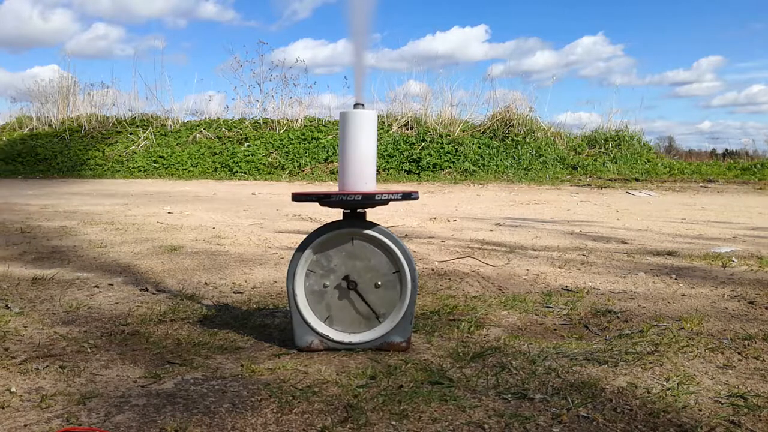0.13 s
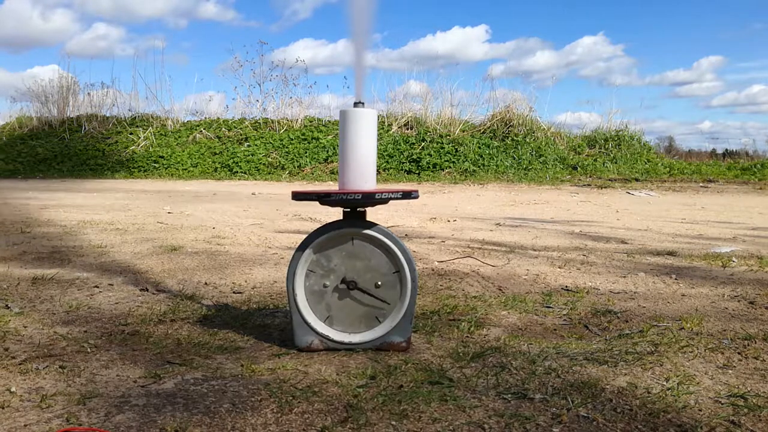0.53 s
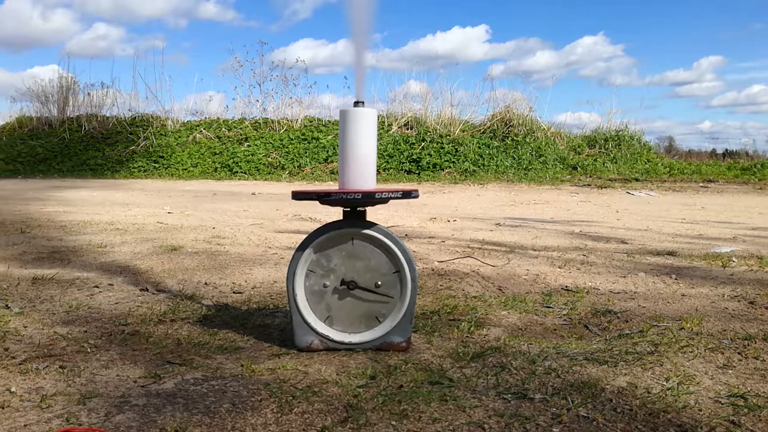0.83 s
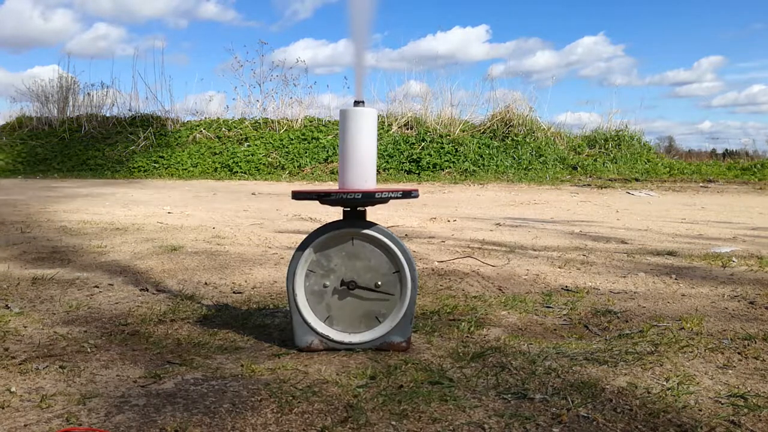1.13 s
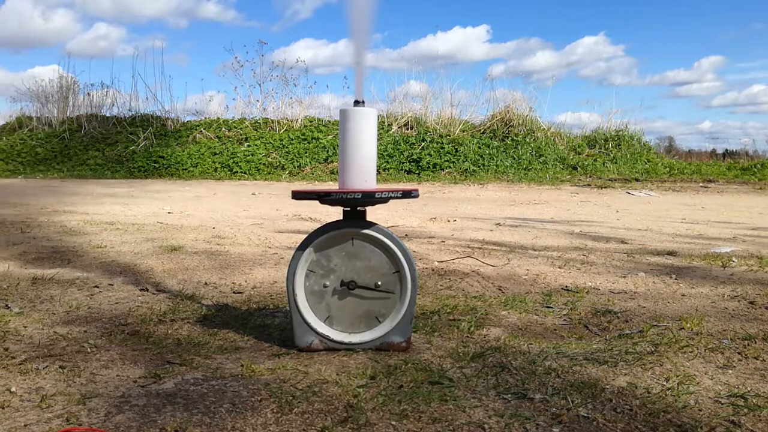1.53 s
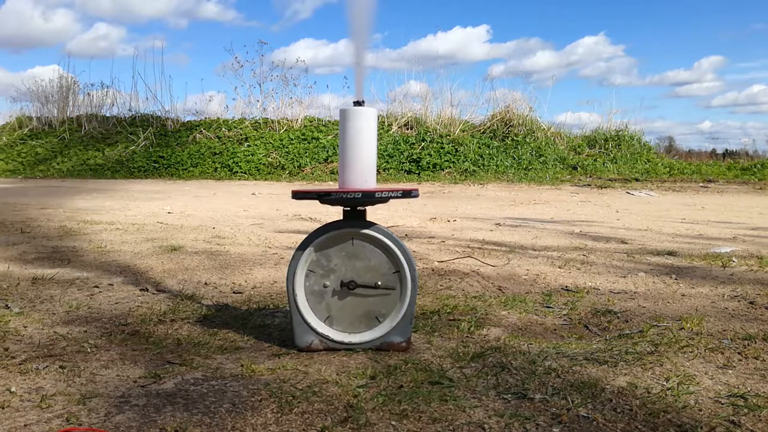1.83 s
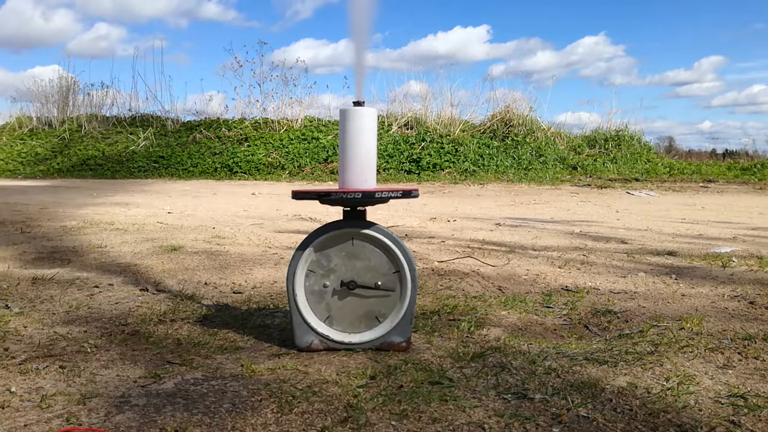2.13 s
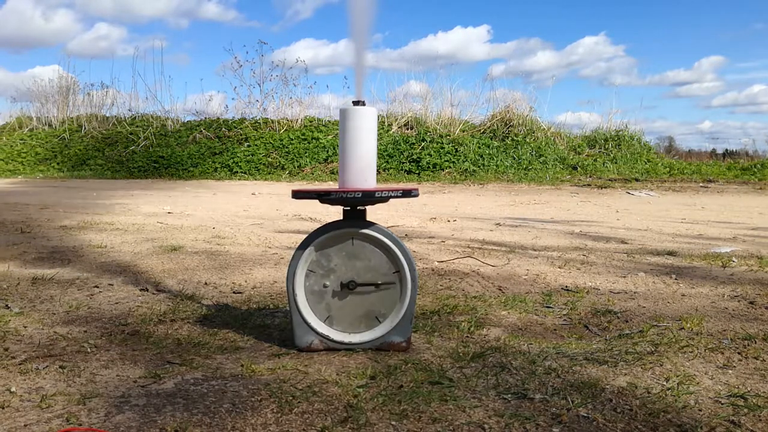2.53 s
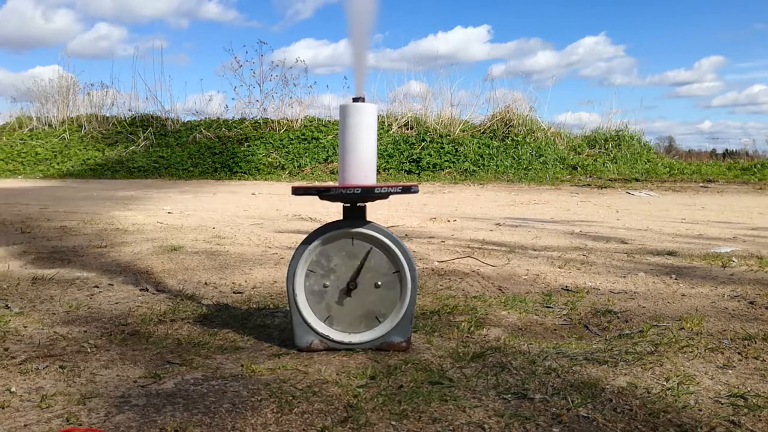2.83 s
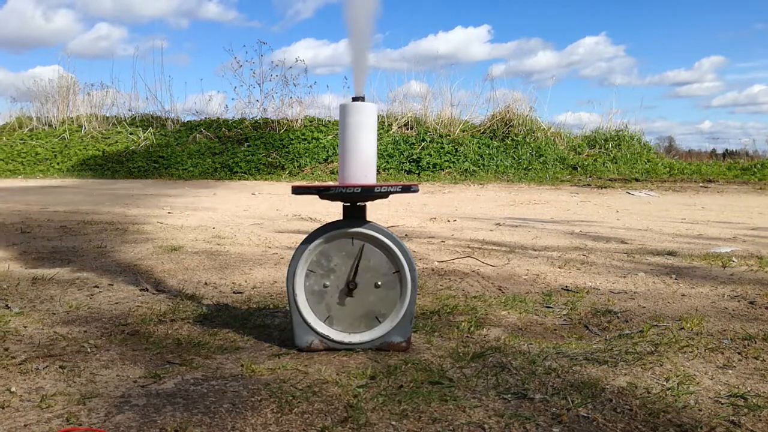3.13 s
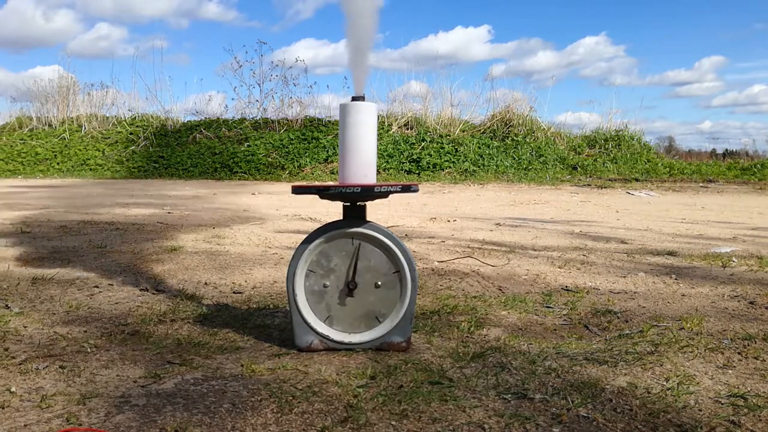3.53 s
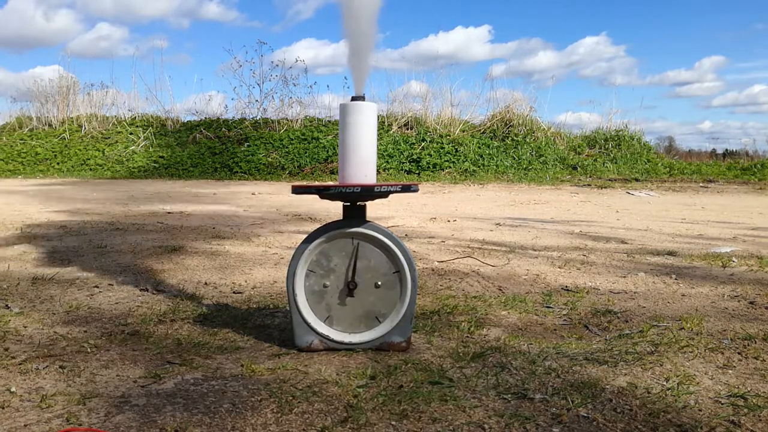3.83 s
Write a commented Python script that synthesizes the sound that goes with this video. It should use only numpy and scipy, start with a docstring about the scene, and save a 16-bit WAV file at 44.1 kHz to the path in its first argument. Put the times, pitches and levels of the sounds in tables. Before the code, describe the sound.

Loud steady rocket jet hiss over a low roar, collapsing quickly into a faint breath of gas

```python
"""Open field: a small solid rocket motor burns nozzle-up on a scale, close to a two-port microphone.
The jet, shaped noise mixed with tiny random shocks, hisses and crackles over the low roar of its plume.
A few soft chuffs are short low pressure swings; the quiet air is faint filtered noise.
Thrust collapses at 2.55 s: the plume shortens, the hiss sinks while its hollow colour slides upward,
and after 3.6 s only a sigh of gas is left."""
import sys
import numpy as np
from scipy import signal
from scipy.fft import rfft, irfft
from scipy.io import wavfile
from scipy.ndimage import uniform_filter1d

SR = 44100
rng = np.random.default_rng(int(sys.argv[2]) if len(sys.argv) > 2 else 0)


def to_wav(s):
    """Save 16-bit WAV."""
    ch = np.atleast_2d(s).T  # columns
    pcm = np.round(np.clip(ch, -1, 1) * 32767)  # PCM
    wavfile.write(sys.argv[1], SR, pcm.astype(np.int16))


N = 176400

# strength of the jet's hiss before trim: time_s, level_db
HISS_LEVEL = [(0, -21), (0.15, -22), (0.32, -22.5), (0.36, -23.8), (0.39, -22.5), (0.58, -24.0),
              (1.15, -24), (1.45, -24), (1.72, -25.5), (2.05, -24.5), (2.25, -23.5), (2.57, -25.5),
              (2.62, -29), (2.71, -34.5), (2.8, -35.8), (3.05, -41), (3.35, -47.5), (3.58, -52.5),
              (3.66, -63.5), (3.85, -72), (4, -80.5)]


def undb(db):
    """Amplitude ratio of a level in dB."""
    return 10 ** (np.asarray(db) / 20)


def curve(rows, t_s, column=1):
    """A table column against time, joined by straight lines."""
    rows = np.array(rows)
    return np.interp(t_s, rows[:, 0], rows[:, column])


def spectrum(rows, hz, column=1):
    """A table column against log frequency."""
    rows = np.array(rows)
    return np.interp(np.log(hz + 1), np.log(rows[:, 0]), rows[:, column])


def walk(rate_per_s):
    """Random levels held for 1 / rate, slewed by two moving averages and scaled to unit deviation."""
    hold = int(SR / rate_per_s)
    steps = np.repeat(rng.standard_normal(N)[:N // hold + 1], hold)
    slow = uniform_filter1d(uniform_filter1d(steps, hold), hold)[:N]
    return slow / slow.std()


def failing(t_s):
    """State of the plume, read from the hiss level: 0 at full thrust, 1 when short and weak."""
    full_db, weak_db = -24.5, -51
    return np.clip((full_db - curve(HISS_LEVEL, t_s)) / (full_db - weak_db), 0, 1)


def turbulence():
    """Mixing noise plus a dense rain of small, uneven shocks whose power share fades with the thrust."""
    shocks_per_s, size_spread_db, full_thrust_share = 2800, 4, 0.29
    sizes = undb(size_spread_db * np.minimum(rng.standard_normal(N), 3))
    shocks = (rng.random(N) < shocks_per_s / SR) * sizes
    shocks = (shocks - shocks.mean()) / shocks.std()
    share = full_thrust_share * (1 - failing(np.arange(N) / SR))
    return np.sqrt(share) * shocks + np.sqrt(1 - share) * rng.standard_normal(N)


def jet_gain(hz, ripple_hz, t_s, weak):
    """Hiss and roar gain by port, frequency and time; colour slides up as the plume shortens."""
    # roar of the large eddies in the plume before trim: time_s, level_db
    roar_level = [(0, -40.5), (0.1, -40.5), (0.9, -43), (1.45, -43.5), (2.05, -44), (2.3, -43),
                  (2.52, -43.2), (2.78, -51), (2.92, -58.5), (3.1, -60.5), (3.2, -66), (3.5, -69.5),
                  (3.87, -77), (4, -82)]
    # colour at full thrust, rippled by the ground reflection: freq_hz, left_rel_db, right_rel_db
    full_colour = [(40, -35, -37.5), (130, -27, -25.5), (220, -12, -13), (328, -11.5, -11),
                   (580, -13.5, -17.5), (770, -15, -13.5), (910, -23, -11), (1104, -11.5, -6.5),
                   (1330, -6.5, -5.5), (1520, -4.5, -3.5), (2050, -2, -8.5), (2500, -7.5, -5.5),
                   (2900, -8.5, -4), (3370, -7, -1.0), (3700, -2.5, -4.5), (4150, -5, -6.5),
                   (4530, -7, -3.5), (5020, -12, 1.5), (5050, -7.5, -2), (5680, -5.5, -3.5),
                   (6680, -7.5, -9.5), (8000, -14.5, -12.5), (9300, -11.5, -18.5), (10600, -11.5, -18),
                   (11700, -14.5, -22.5), (13100, -13.5, -18.0), (15600, -14.5, -16.5)]
    # colour of the failing plume before the ripple slides up: freq_hz, left_rel_db, right_rel_db
    weak_colour = [(40, -27, -27), (140, -20.0, -20.0), (270, -17.5, -17.5), (400, -18.0, -18.0),
                   (600, -16.0, -24), (780, -19.5, -23), (920, -29.5, -12), (1060, -10, -4.5),
                   (1350, -3.5, -2), (1640, -2.5, -4.5), (1900, 1, -3), (2150, -6.5, 0.5), (2650, -4, -9.5),
                   (3220, -9.0, 0.5), (3800, -5, -3.0), (4400, -10, -4), (5200, -8, -4.5),
                   (6370, -9.5, -13.5), (7000, -14.5, -16), (7880, -15.5, -13.5), (8600, -19.5, -23),
                   (10800, -16, -22.5), (15500, -18, -21)]
    # dull, hollow colour of the last gas leaving the casing: freq_hz, left_rel_db, right_rel_db
    spent_colour = [(50, -13, -12), (200, -2.0, -2.0), (400, -2, -2), (650, -6, -10), (1030, -13, -11.5),
                    (1400, -7, -1.5), (1800, -5.0, -5), (2130, 0, -3), (2450, -7, 2), (2900, -7.0, -13),
                    (3300, -11, -9), (3750, -14.0, -3), (4250, -7, -2), (5000, -17.0, -11.0),
                    (5800, -11.0, -8.0), (7200, -15, -17), (8200, -22, -25), (9000, -26.5, -28.0),
                    (11000, -23, -30.0), (15500, -32, -31.5)]
    hiss_trim_db, roar_trim_db, split_hz = 3.5, 1.25, 898
    sigh_onset_db, sigh_range_db = -51, 10  # hiss level where the sigh sets in, further fall to sigh alone

    def both_ports(rows, at_hz):
        return np.array([spectrum(rows, at_hz, 1), spectrum(rows, at_hz, 2)])

    def at_level(gain, db):
        return gain * undb(db) / np.sqrt(np.mean(gain ** 2, axis=(0, 1)))

    hiss_db = curve(HISS_LEVEL, t_s)
    spent = np.clip((sigh_onset_db - hiss_db) / sigh_range_db, 0, 1)
    full_db = both_ports(full_colour, ripple_hz)
    weak_db = both_ports(weak_colour, ripple_hz)
    burning_db = (1 - weak) * full_db + weak * weak_db
    colour = undb((1 - spent) * burning_db + spent * both_ports(spent_colour, hz))
    low = 1 / (1 + (ripple_hz / split_hz) ** 20)  # power share of the roar region
    hiss = at_level(colour * np.sqrt(1 - low), hiss_db + hiss_trim_db)
    roar = at_level(colour * np.sqrt(low), curve(roar_level, t_s) + roar_trim_db)
    return np.hypot(hiss, roar)


def jet():
    """Fluttering turbulence that reaches the two ports partly alike and slightly out of step."""
    # likeness of the jet at the two ports: freq_hz, coherence_0_1, left_lead_rad
    full_ports = [(30, 1.0, 0.0), (450, 0.99, 0.0), (800, 0.49, -1.9), (950, 0.56, -0.1),
                  (1150, 0.97, -0.3), (1700, 0.96, -0.1), (2200, 0.67, -0.6), (2800, 0.26, -2.3),
                  (3400, 0.61, -0.6), (3950, 0.45, -1.4), (4650, 0.49, -3.0), (5100, 0.58, -1.8),
                  (5700, 0.61, -2.0), (6500, 0.71, -2.8), (8000, 0.92, -3.1), (9400, 0.45, -3.9),
                  (11500, 0.44, -6.0), (13500, 0.57, -7.3), (15600, 0.53, -7.7)]
    # likeness of the short plume at the two ports: freq_hz, coherence_0_1, left_lead_rad
    weak_ports = [(30, 1.0, 0.0), (350, 0.97, -0.1), (560, 0.69, -0.3), (780, 0.75, -1.6), (950, 0.63, 0.1),
                  (1150, 0.93, -0.4), (1600, 0.94, -0.1), (2450, 0.63, -0.8), (2850, 0.62, -2.5),
                  (3400, 0.51, -1.3), (3900, 0.69, -1.3), (4400, 0.51, -1.9), (5100, 0.73, -2.3),
                  (5800, 0.74, -2.0), (8000, 0.92, -3.1), (9400, 0.48, -3.9), (11500, 0.38, -5.8),
                  (13500, 0.49, -7.4), (15600, 0.43, -7.9)]
    flutter_per_s, flutter_db, surge_per_s, surge_db = 92, 0.36, 7.9, 0.26
    ripple_rise, ripple_top_hz = 0.17, 7000  # upward shift as a share of frequency, fading above top
    sway_share, sway_per_s = 0.013, 7  # the swaying plume shifts the ripple
    billow_db, billow_per_s, billow_top_hz = 3.0, 9.2, 150  # swells of the deepest rumble
    weak_colour_at = 0.86  # failing state at which the colour is fully weak

    unsteady = undb(flutter_db * walk(flutter_per_s) + surge_db * walk(surge_per_s))
    eddies = np.array([turbulence(), turbulence()]) * unsteady
    hz, t_s, (shared, apart) = signal.stft(eddies, SR, nperseg=1024, noverlap=768)
    hz = hz[:, None]

    def frame_walk(rate_per_s):
        return np.interp(t_s, np.arange(N) / SR, walk(rate_per_s))

    rise = ripple_rise * failing(t_s) + sway_share * frame_walk(sway_per_s)
    ripple_hz = hz / (1 + rise / (1 + (hz / ripple_top_hz) ** 10))
    billows = undb(billow_db * frame_walk(billow_per_s) / (1 + (hz / billow_top_hz) ** 2))
    weak = np.clip(failing(t_s) / weak_colour_at, 0, 1)

    def port_blend(column):
        full = spectrum(full_ports, ripple_hz, column)
        return (1 - weak) * full + weak * spectrum(weak_ports, ripple_hz, column)

    coherence = np.clip(port_blend(1), 0, 1)
    sides = np.array([1, -1])[:, None, None]  # left, right
    ports = np.sqrt((1 + coherence) / 2) * shared + sides * np.sqrt((1 - coherence) / 2) * apart
    lead = np.exp(.5j * sides * port_blend(2))  # half the phase lead on each side
    heard = ports * lead * billows * jet_gain(hz, ripple_hz, t_s, weak)
    return signal.istft(heard, SR, nperseg=1024, noverlap=768)[1][:, :N]


def chuffs():
    """Uneven burning spurts gas: each chuff is a low sine swing under a short Gaussian envelope."""
    # chuffs of uneven burning: middle_s, envelope_peak_db, pitch_hz
    chuff_rows = [(0.02, -29, 280), (0.045, -42, 125), (0.762, -32, 280), (1.203, -34, 284),
                  (1.25, -33, 287), (1.94, -39.5, 174), (2.276, -28, 282), (3.066, -58, 250)]
    sigma_cycles = 0.6
    out = np.zeros(N)
    for middle_s, peak_db, pitch_hz in chuff_rows:
        cycles = (np.arange(N) / SR - middle_s) * pitch_hz
        envelope = undb(peak_db) * np.exp(-.5 * (cycles / sigma_cycles) ** 2)
        out += envelope * np.sin(2 * np.pi * cycles)
    return out


def field():
    """Faint outdoor rumble: noise shaped by a falling spectrum, alike on both sides."""
    # quiet air of the field: freq_hz, rel_level_db
    air_colour = [(20, -10.5), (45, -2.5), (80, -3), (200, -3), (400, -13.5), (1000, -31), (4000, -37),
                  (16000, -54)]
    rms_db = -79
    hz = np.arange(N // 2 + 1) * SR / N
    air = irfft(rfft(rng.standard_normal(N)) * undb(spectrum(air_colour, hz)), N)
    return air / air.std() * undb(rms_db)


def scene():
    """The motor in the quiet field."""
    return jet() + chuffs() + field()


def record(dry):
    """The recorder cuts the top steeply with an elliptic low-pass."""
    top_hz, ripple_db, stop_db = 15700, .1, 80
    low_pass = signal.ellip(12, ripple_db, stop_db, top_hz, fs=SR, output="sos")
    return signal.sosfilt(low_pass, dry)


dry = scene()
out = record(dry)
to_wav(out)
```